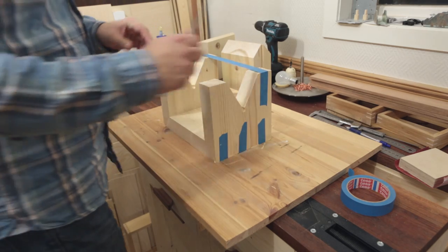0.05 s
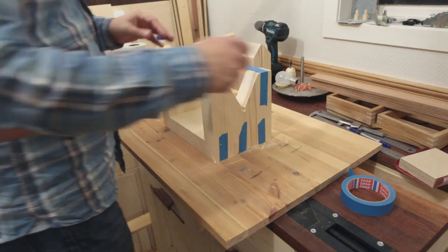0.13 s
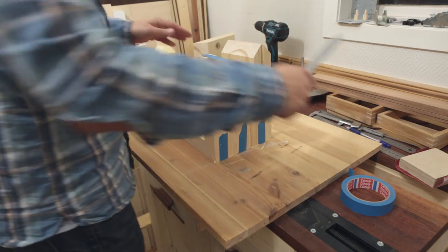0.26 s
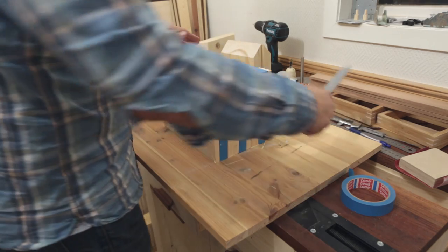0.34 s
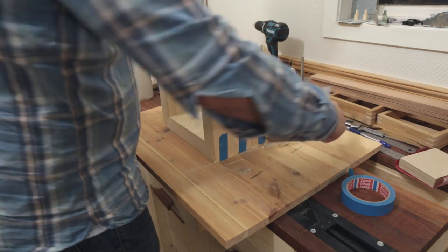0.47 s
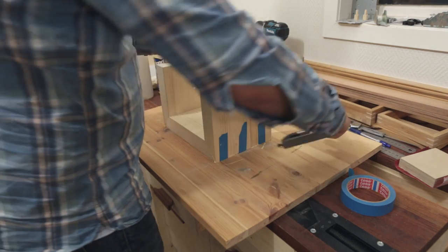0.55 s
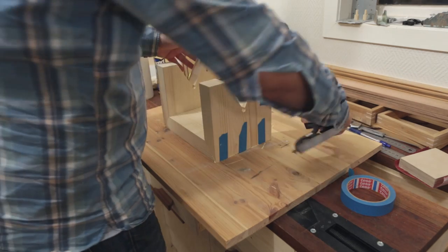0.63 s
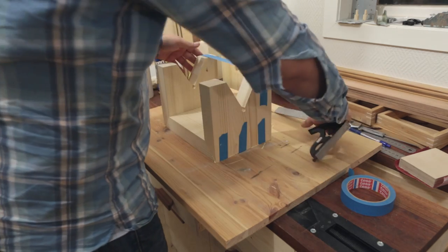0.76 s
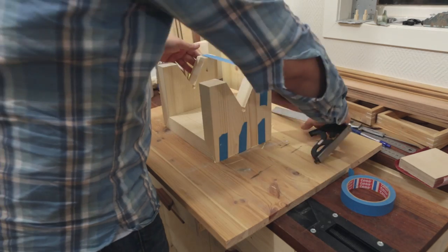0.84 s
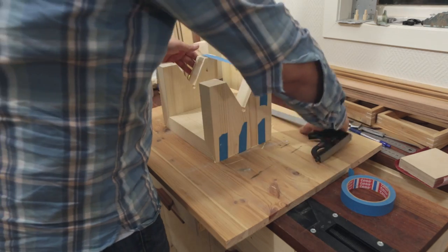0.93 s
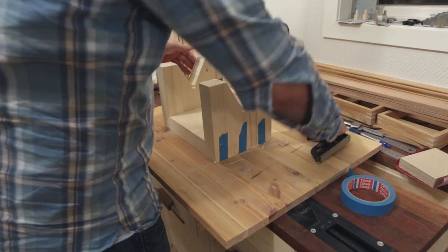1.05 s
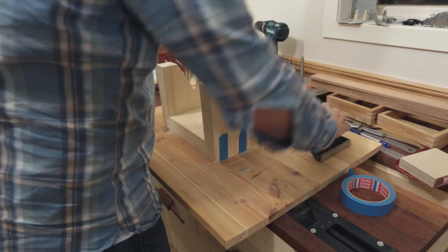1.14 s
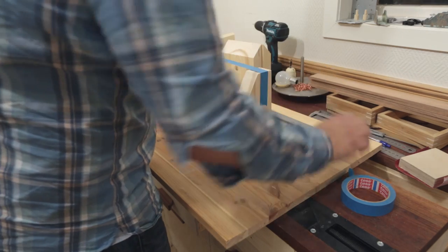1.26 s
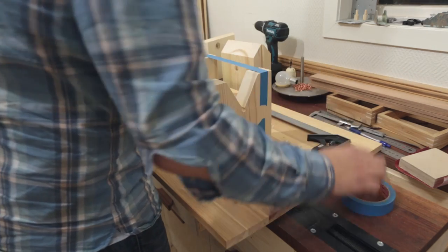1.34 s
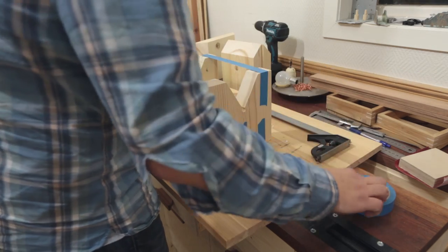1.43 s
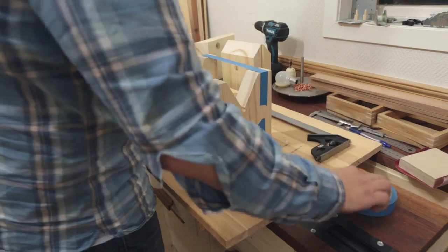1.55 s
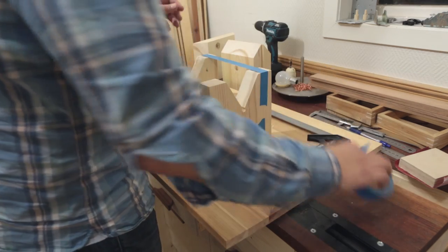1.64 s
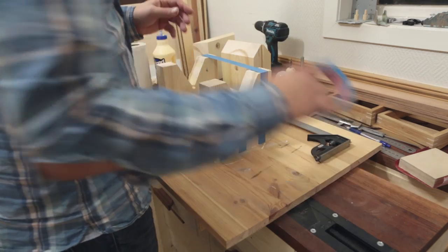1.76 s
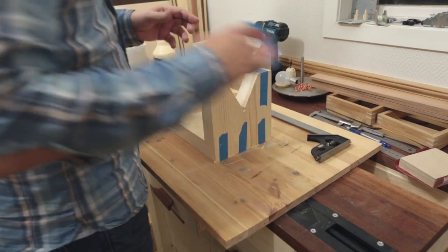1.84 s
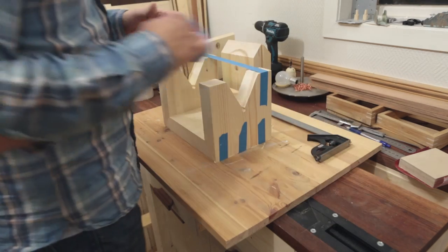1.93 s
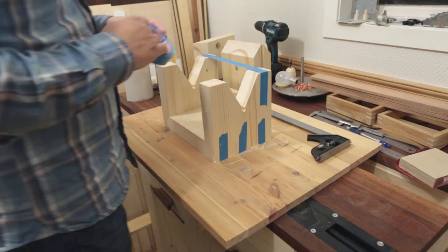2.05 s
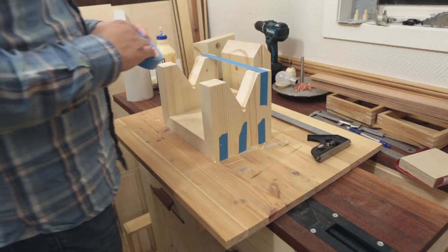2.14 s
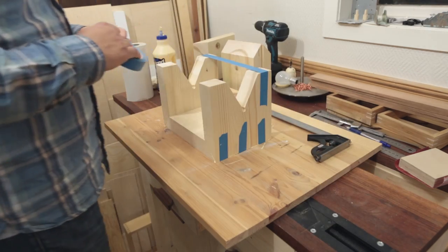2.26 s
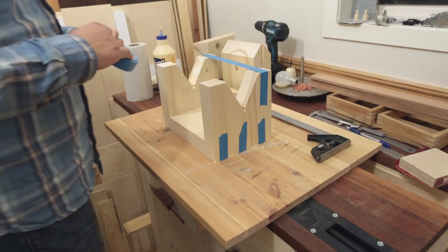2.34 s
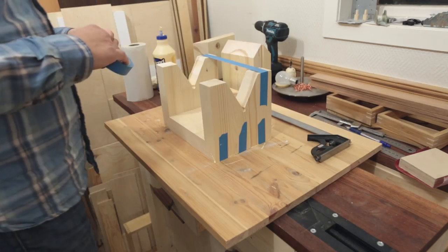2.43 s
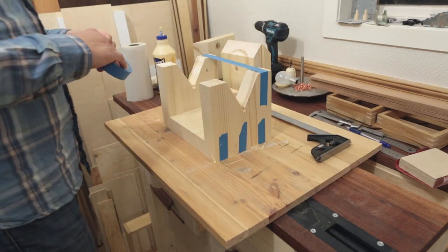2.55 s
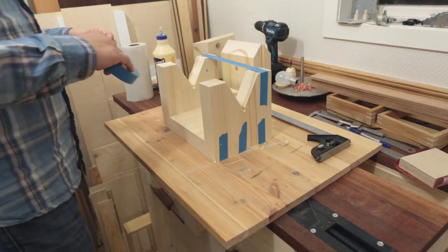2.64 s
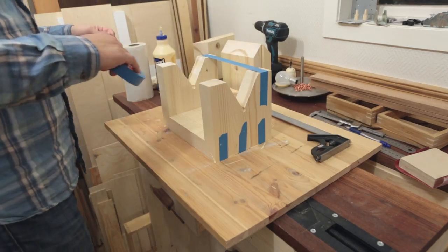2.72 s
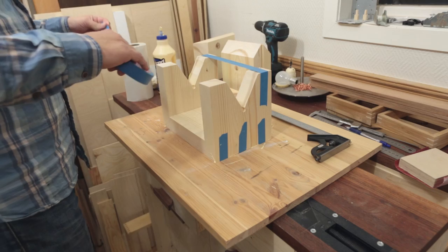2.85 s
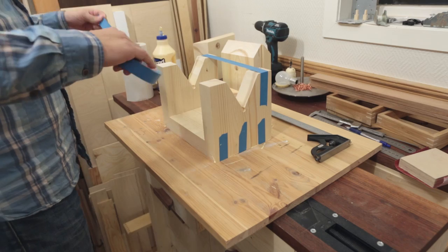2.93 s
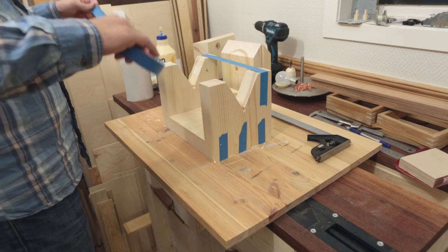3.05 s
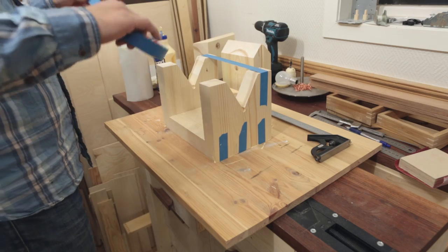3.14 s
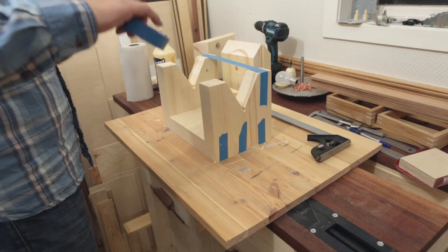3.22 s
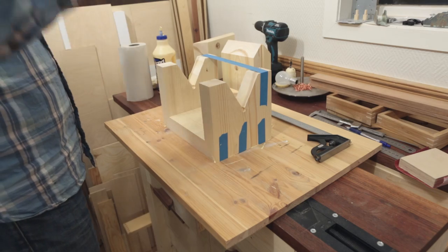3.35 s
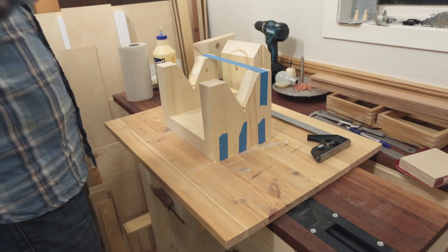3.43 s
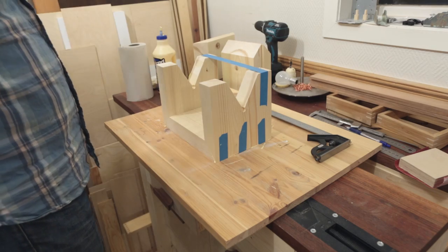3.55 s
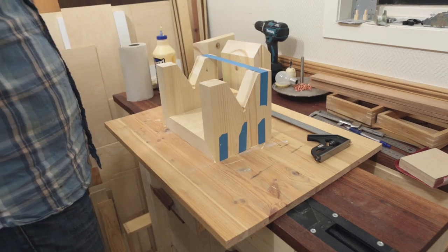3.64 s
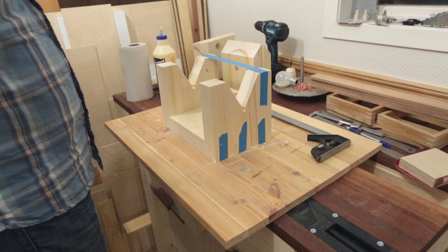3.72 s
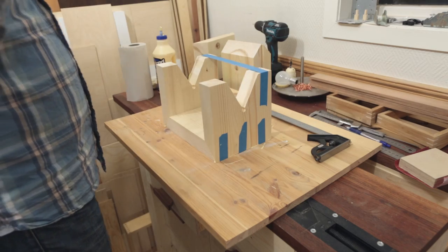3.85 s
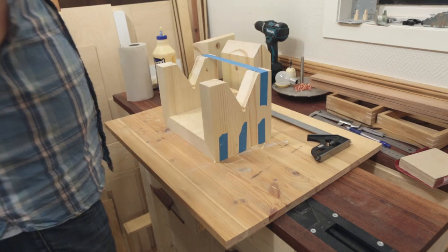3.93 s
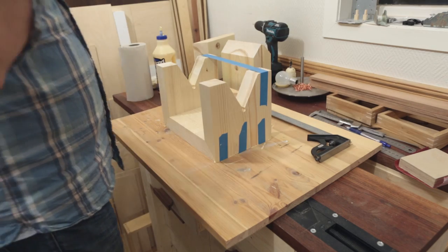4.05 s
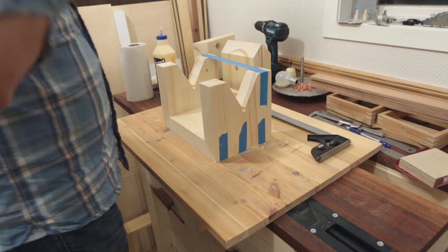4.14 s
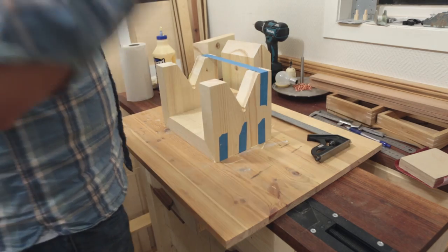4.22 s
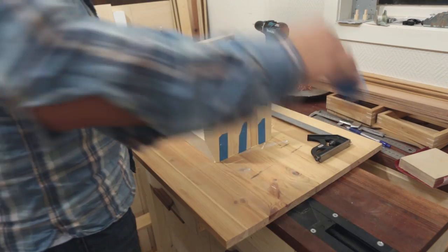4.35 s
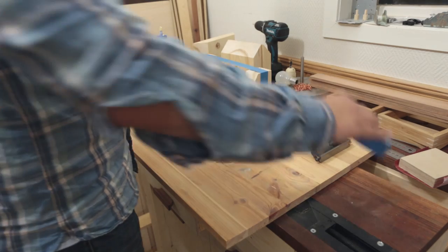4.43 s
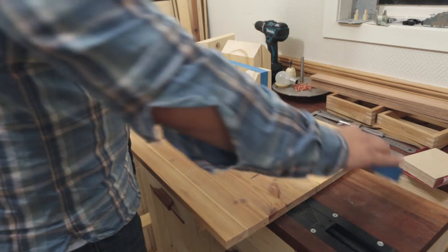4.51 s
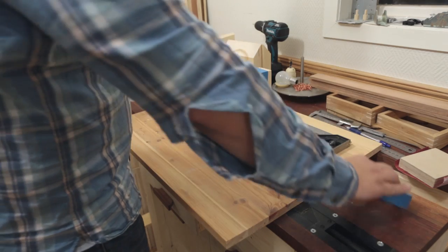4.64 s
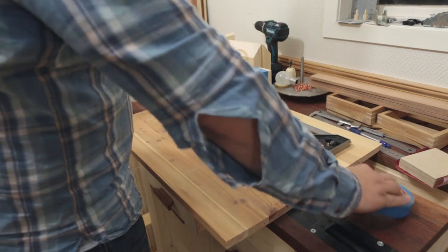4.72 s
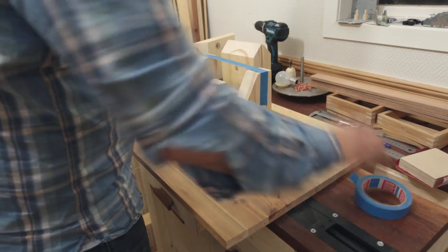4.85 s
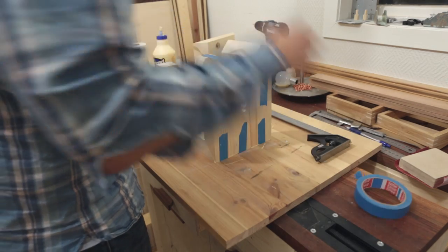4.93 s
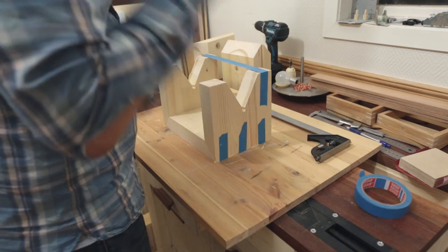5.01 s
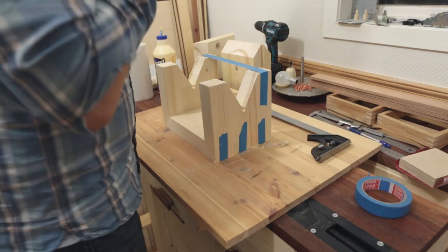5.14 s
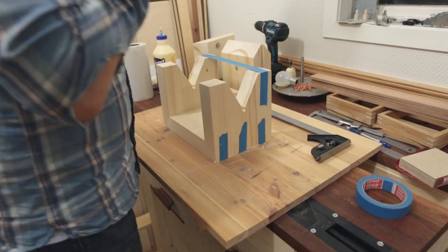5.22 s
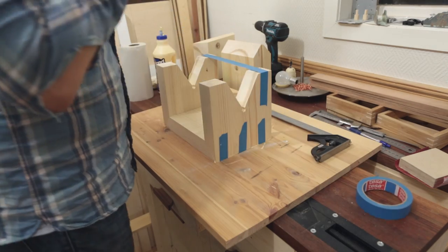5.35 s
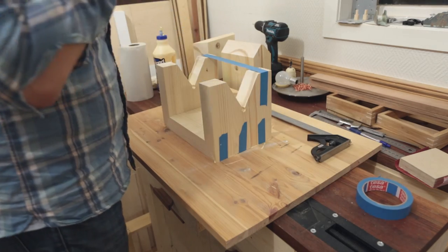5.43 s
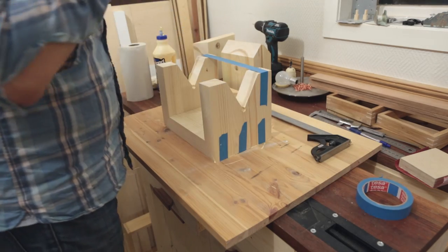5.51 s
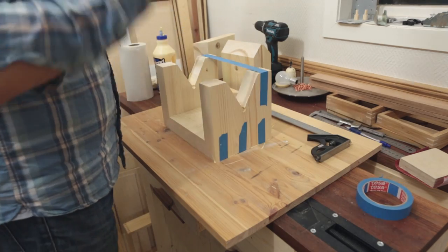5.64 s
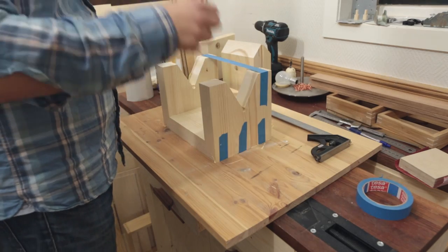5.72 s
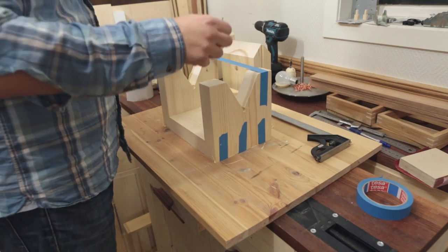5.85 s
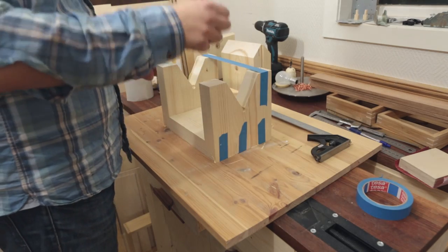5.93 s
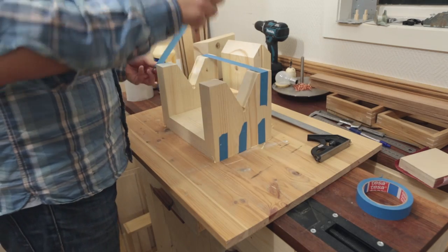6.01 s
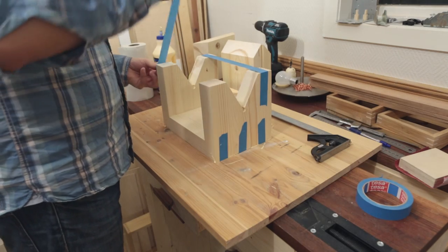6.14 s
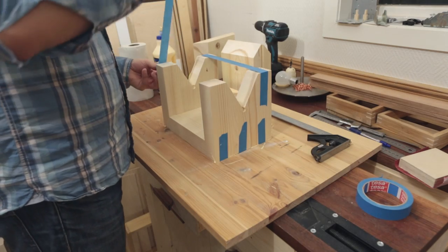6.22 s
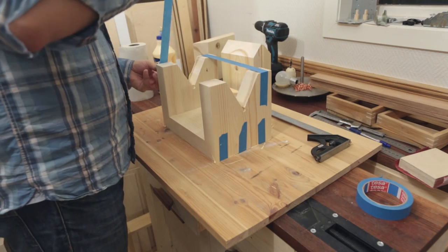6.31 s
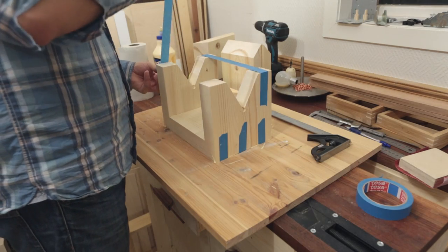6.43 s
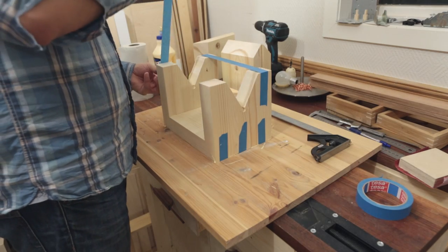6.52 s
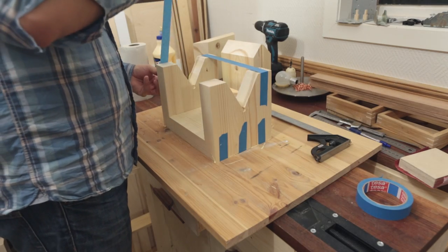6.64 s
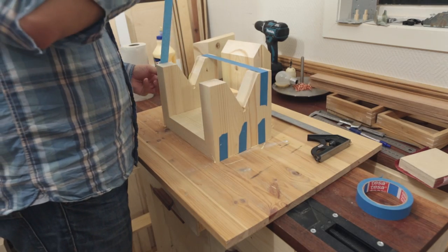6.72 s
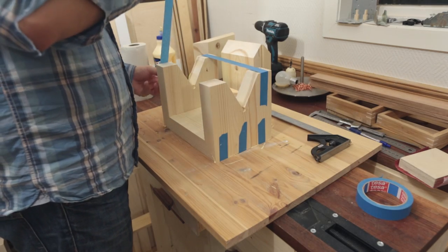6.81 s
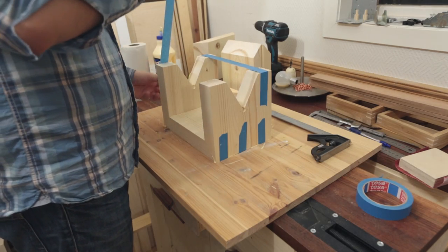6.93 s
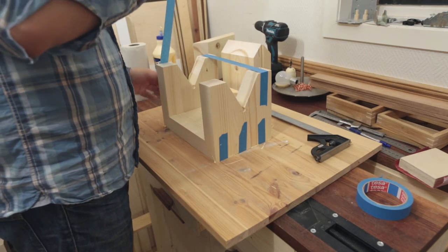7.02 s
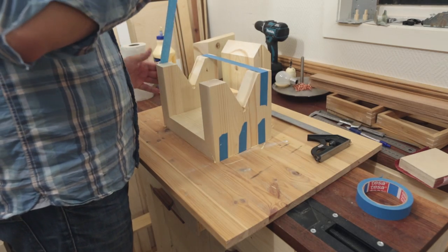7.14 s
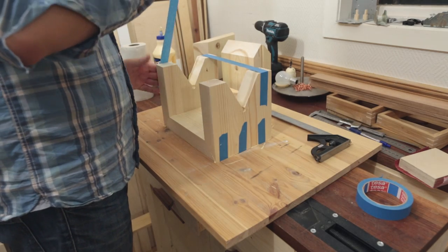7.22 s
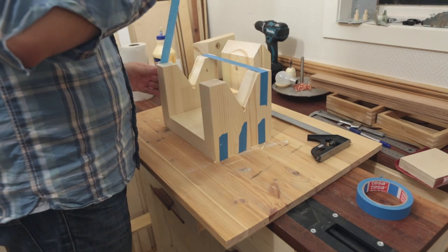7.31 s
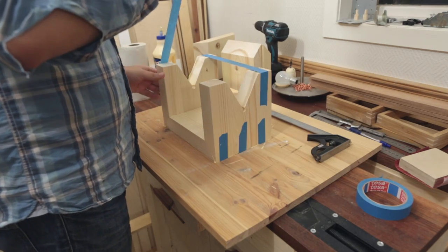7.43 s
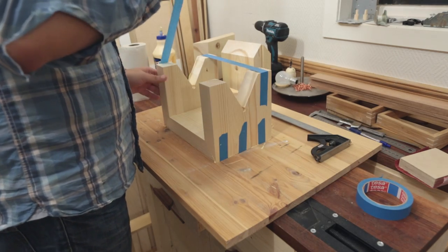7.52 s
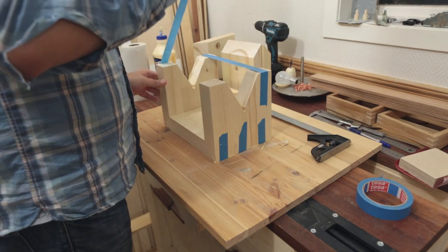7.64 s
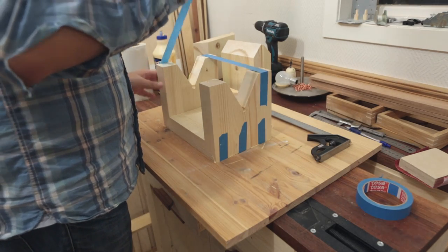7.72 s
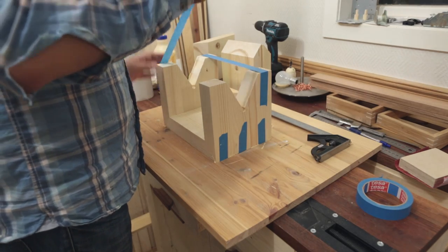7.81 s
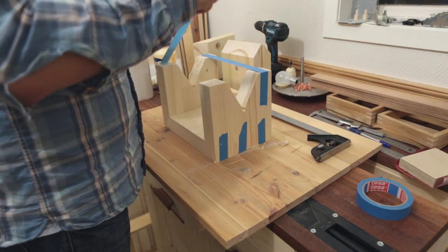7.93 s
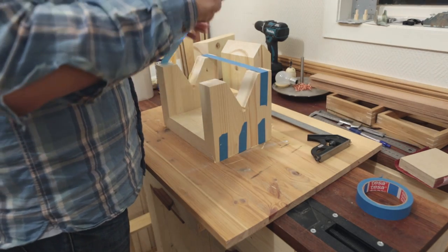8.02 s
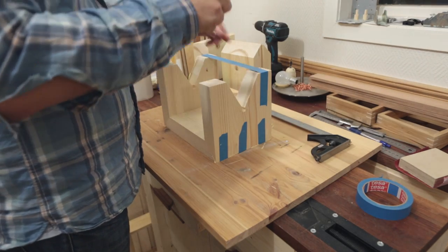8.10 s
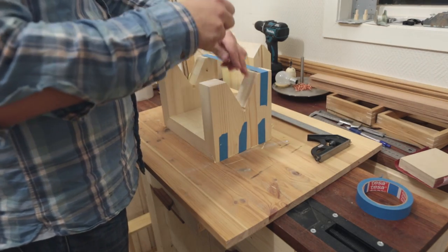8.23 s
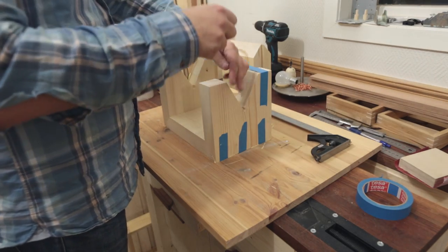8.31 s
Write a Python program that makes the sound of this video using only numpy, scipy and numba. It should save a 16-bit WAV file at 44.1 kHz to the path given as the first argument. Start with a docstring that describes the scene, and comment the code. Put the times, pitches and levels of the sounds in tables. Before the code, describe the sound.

A small, reflective workshop heard from close to the bench, with steady soft hiss and occasional cloth rustle. Dull knocks open at 0-0.1 s. At 0.85-0.93 s a stapler knocks on a pine board, then topples at 1.13-1.27 s with woody boom and a short metallic clatter. Light cardboard taps and soft knocks follow from 1.6 to 2.3 s as the tape roll is lifted. After a tiny start at 2.5 s, a loud, dense, crackling rip runs about 2.6-3.1 s, its pitch sinking as the strip lengthens; short rasping jerks follow at 3.15-3.5 s. Small snaps at 4.04-4.2 s swell into a sharp, very loud tear at 4.21 s. The roll lands at 4.76-4.9 s and wobbles from 5.0 s, quickening, weakening taps over a growing rumble that stops at 5.65 s. A tiny clink at 5.78 s, faint tape squeak near 6, crinkles and snaps around 6.8-7.0, then faint rubs, a squeak and rustle to the end.

```python
"""Soft bench knocks come first, then a stapler is put down on a pine board and topples over: struck modes.
Masking tape is pulled off its roll in one long rip and a few jerks, then torn off: a crackle of
tiny fractures, radiated by a strip that sounds lower as it lengthens. The dropped roll wobbles to
rest in ever quicker taps over a rumble, while the strip crinkles and is smoothed onto the work.
Cloth rustles softly, a small workshop reflects everything, and a steady hiss lies beneath."""
import sys
import numpy as np
from scipy import signal
from scipy.fft import rfft, irfft, next_fast_len
from scipy.io import wavfile
from scipy.ndimage import uniform_filter1d
from numba import njit

SR = 44100
rng = np.random.default_rng(int(sys.argv[2]) if len(sys.argv) > 2 else 0)


def log_audio(samples):
    """Write samples as a 16-bit WAV file to the path given in sys.argv[1]."""
    # one column per channel
    frames = np.atleast_2d(samples).T
    # limit to full scale, then quantise
    limited = np.clip(frames, -1, 1)
    pcm = np.round(limited * 32767).astype(np.int16)
    wavfile.write(sys.argv[1], SR, pcm)


N = 369116
TIME = np.arange(N) / SR

# Glue threads snapping, relative spectrum: pitch_hz [Hz], level_db [dB per Hz]
PEEL_SPECTRUM = [(40, -9), (80, 6), (130, -9), (200, -2), (310, -4), (420, -2), (620, -3.5), (1100, -1.5),
                 (2000, -3.5), (3000, 0.5), (5000, 0.5), (8000, -0.5), (12000, -1), (16000, -5)]
# Resonances of the roll's cardboard core: pitch_hz [Hz], width_hz [Hz], level_db [dB]
CORE_RESONANCES = [(403, 49, 5), (517, 59, 1), (1320, 41, -12), (1550, 68, -0.5)]
# The free strip lengthens with the pull and so sounds lower
STRIP_START_M, STRIP_END_M, SOUND_M_PER_S = 0.028, 0.5, 343
STRIP_SPREAD_SHARE = 0.37   # share of the pull over which the arms do most of their spreading
# Its resonance lies this far above the lowest pitch that it radiates
RING_START_OFFSET_HZ, RING_END_OFFSET_HZ = 1910, 970
GRIP_TIGHT_DB, GRIP_LOOSE_DB = -16, 0.5   # drive of the core in a tight and in a loose hand


def peel():
    """Fracture noise and quarter-wave radiation: glue threads snap, and a longer strip radiates deeper."""
    pull = pull_speed()
    unrolled = np.cumsum(pull) / pull.sum()
    spread = 1 - np.exp(-unrolled / STRIP_SPREAD_SHARE)
    length_m = STRIP_START_M + (STRIP_END_M - STRIP_START_M) * spread
    lowest_hz = SOUND_M_PER_S / (4 * length_m)
    offset_hz = RING_START_OFFSET_HZ + (RING_END_OFFSET_HZ - RING_START_OFFSET_HZ) * unrolled
    lowest_step = np.tan(np.pi * lowest_hz / SR)
    ring_step = np.tan(np.pi * (lowest_hz + offset_hz) / SR)

    # the ridges of the crepe paper let go in clumps
    ridge_noise = low_cut(soften(rng.normal(size=N), 550), 140)
    ridges = unit(amp(3.0 * unit(ridge_noise)))
    snapping = soften(pull, 200, order=1) * ridges * crackle(per_s=4000, spread_db=5.0)
    threads = colour(snapping, PEEL_SPECTRUM)

    # two high-pass stages follow the lowest radiated pitch
    first_stage, _ = sweep(threads, lowest_step, 1.7)
    radiated, _ = sweep(first_stage, lowest_step, .8)
    _, low_ring = sweep(radiated, ring_step, .24)
    _, high_ring = sweep(radiated, 3.1 * ring_step, .18)
    strip_ring = amp(.5) * low_ring + amp(-9) * high_ring

    # the core rings more freely as the arms spread and the grip loosens
    loose = amp(np.interp(unrolled, [.45, .85], [GRIP_TIGHT_DB, GRIP_LOOSE_DB]))
    core_ring = sum(amp(db) * resonate(loose * radiated, hz, width_hz)
                    for hz, width_hz, db in CORE_RESONANCES)
    return radiated + strip_ring + core_ring


# Short jerks on the tape: start_s [s], length_s [s], level_db [dB]
TAPE_JERKS = [(2.514, .03, -49), (2.542, 0.039, -39), (3.155, 0.0073, -30), (3.184, 0.018, -22),
              (3.222, 0.073, -22.5), (3.316, 0.012, -22), (3.442, 0.024, -29), (3.482, 0.036, -47)]
JERK_RELEASE_DB_PER_S = 700
# The long pull speeds up, holds while slowly sagging, and lets go
PULL_FULL_S, PULL_HOLD_S, PULL_DB = 2.6546, .415, -19
PULL_ATTACK_DB_PER_S, PULL_SAG_DB_PER_S, PULL_RELEASE_DB_PER_S = 299, 10.5, 188


def pull_speed():
    """Excitation by speed: one long pull and sudden jerks set how fast the tape leaves the roll, as a gain."""
    speed = stroke(PULL_FULL_S, PULL_DB, PULL_ATTACK_DB_PER_S, PULL_RELEASE_DB_PER_S,
                   PULL_HOLD_S, PULL_SAG_DB_PER_S)
    for s, length, db in TAPE_JERKS:
        jerk = (TIME >= s) * stroke(s, db, 0, JERK_RELEASE_DB_PER_S, length)
        speed = np.maximum(speed, jerk)
    return speed


# Parting paper fibres, relative spectrum: pitch_hz [Hz], level_db [dB per Hz]
FIBRE_SPECTRUM = [(300, -23), (1500, -28), (2800, -10), (4500, -3), (8000, -4.5), (16000, -7.5)]
# Fingers sliding along the tape: middle_s [s], length_s [s], level_db [dB]
FINGER_RUBS = [(5.53, 0.19, -56.5), (6.81, .14, -53), (6.912, 0.017, -36.5), (7.03, 0.055, -52),
               (7.44, 0.097, -54.5), (7.75, 0.091, -63)]
# The tear swells until the strip is off
TEAR_S, TEAR_DB, TEAR_ATTACK_DB_PER_S, TEAR_RELEASE_DB_PER_S = 4.207, -24.5, 340, 1200


def paper():
    """Fibre fracture: crackle bursts as the strip tears across, and again as fingers rub it down."""
    tearing = stroke(TEAR_S, TEAR_DB, TEAR_ATTACK_DB_PER_S, TEAR_RELEASE_DB_PER_S)
    tear = tearing * crackle(per_s=1500, spread_db=6)
    rub = swells(FINGER_RUBS) * crackle(per_s=1000, spread_db=7.0)
    return colour(tear + rub, FIBRE_SPECTRUM)


# Stapler on the board: start_s [s], board_db [dB], ring_db [dB], clatter_db [dB], contact_hz [Hz]
STAPLER_HITS = [(0.8534, -17.5, -30, -23.5, 5060), (0.87, -21.5, -38.5, -37, 1203),
                (0.9096, -24, -35, -10, 3002), (0.928, -16, -41, -16, 699),
                (1.134, -25, -12.5, -16.5, 2580), (1.155, -18, -20.5, -20.5, 1203),
                (1.176, -19, -21, -14, 1985), (1.2279, -39, -12, -18.5, 900),
                (1.242, -19.5, -10.5, -1, 5013), (1.2492, -39, -19, -7, 4982), (1.270, -42, -18, -11, 4962)]
# Modes of the pine board, the steel and the housing: pitch_hz [Hz], level_db [dB], t60_s [s]
BOARD_MODES = [(258, -12, .1), (291.7, 5, 0.21), (344.4, 1, 0.27), (397, 2, .17), (419, -4, 0.17)]
STEEL_MODES = [(787, -15.5, 0.39), (900.6, -12.5, 0.083), (996, -7, 0.14), (1026.6, -3.5, 0.31),
               (1079, -3, 0.071), (1162, -2.5, 0.12), (1366, -21.5, 0.073), (1480, -20.5, 0.14),
               (1780, -16, 0.16), (1845, -21, 0.11), (2266, -17.5, .14), (2694, -23.5, .1),
               (3261, -26, .07), (4000, -29, 0.067), (6640, -22.5, 0.13), (11100, -31.5, .1)]
HOUSING_MODES = [(443, -7, .13), (472.5, -8, .19), (500, -7.5, .1), (538.4, -14, 0.13), (586, -10, .17),
                 (706, -15.5, 0.14)]
# Dense short-lived modes under the separate ones, relative: pitch_hz [Hz], level_db [dB per Hz]
CLATTER_SPECTRUM = [(40, -32.5), (100, -33.5), (200, -15.5), (300, -11), (520, -1), (800, -5.5),
                    (1100, -7.5), (1400, -12.5), (1900, -12.5), (2400, -15.5), (3500, -18.5), (6000, -23.5),
                    (10000, -28.5), (16000, -29.5)]


def stapler():
    """Modal impact: blows boom in the board, ring the steel, rattle the housing; returns (boom, clack)."""
    boom, clack = np.zeros(N), np.zeros(N)
    for s, board_db, ring_db, clatter_db, contact_hz in STAPLER_HITS:
        low_modes = amp(board_db) * ring(BOARD_MODES) + amp(clatter_db) * ring(HOUSING_MODES)
        add(boom, s, low_modes)
        clatter = amp(clatter_db) * burst(CLATTER_SPECTRUM, t60=0.045)
        add(clack, s, soften(amp(ring_db) * ring(STEEL_MODES) + clatter, contact_hz, order=1))
    return low_cut(boom, 120), low_cut(clack, 40)


# Fingers and the roll tapping: start_s [s], level_db [dB], contact_hz [Hz]
CORE_TAPS = [(1.627, -28.5, 8150), (2.048, -27, 5950), (2.3275, -22.5, 3046), (4.900, -16.5, 6040),
             (4.9115, -11.5, 11020), (5.568, -24, 9000), (5.7815, -23, 3500), (6.905, -21, 4000)]
# Tap on cardboard, relative spectrum: pitch_hz [Hz], level_db [dB per Hz]
TAP_SPECTRUM = [(150, -28), (700, -12.5), (1400, -1), (2500, 0), (4000, -4), (7000, -3.5), (16000, -11)]
# Snaps of the taut strip: start_s [s], level_db [dB], lowest_hz [Hz]
STRIP_SNAPS = [(4.0395, -16, 2470), (4.148, -15, 3000), (4.1572, -12, 3000), (4.1756, -6, 2360),
               (4.1962, -3, 2300), (4.2087, 13.5, 1420), (4.211, 4.5, 250), (4.2154, -4, 200),
               (6.8272, -12.5, 1200), (6.910, -22, 300), (6.9124, -8.5, 300)]
# Snap of the strip, relative spectrum: pitch_hz [Hz], level_db [dB per Hz]
SNAP_SPECTRUM = [(40, -33), (150, -24), (400, -9.5), (1200, -5.5), (2300, -3.5), (3300, -2.5), (4400, 1),
                 (6500, -3), (10000, -7.5), (16000, -12)]
# Modes of a light clink: pitch_hz [Hz], level_db [dB], t60_s [s]
CLINK_MODES = [(1276, 8, 0.036), (1298, -26, 0.28), (1390, 4, 0.066), (1520, -10, 0.061), (3340, -3, 0.035),
               (3750, -12, 0.052), (4620, -6, 0.04)]
CLINK_S, CLINK_DB = 5.7814, -40.5
RIM_DB, RIM_LOSS_DB, RIM_CONTACT_HZ = -16, 2.5, 4900   # first touch; loss per touch


def small_clicks():
    """Impulse response: taps on the cardboard core, snaps of the strip and a clink are brief pulses."""
    out = np.zeros(N)
    rim = [(s, RIM_DB - RIM_LOSS_DB * k, RIM_CONTACT_HZ) for k, s in enumerate(rim_touches())]
    for s, db, contact_hz in list(CORE_TAPS) + rim:
        tap = amp(db) * click(TAP_SPECTRUM, rattle_db=-17, t60=0.026)
        add(out, s, soften(tap, contact_hz))
    for s, db, lowest_hz in STRIP_SNAPS:
        snap = amp(db) * click(SNAP_SPECTRUM, rattle_db=-30.5, t60=0.025)
        add(out, s, low_cut(snap, lowest_hz))
    add(out, CLINK_S, amp(CLINK_DB) * ring(CLINK_MODES))
    return low_cut(out, 70)


# The dropped roll wobbles: its rim touches down ever sooner
WOBBLE_START_S, WOBBLE_GAP_S, WOBBLE_GAP_RATIO = 4.997, .088, .935


def rim_touches(count=9):
    """Geometric series of contacts: each gap between touches of the rim is a fixed share of the last."""
    elapsed_gaps = (1 - WOBBLE_GAP_RATIO ** np.arange(count)) / (1 - WOBBLE_GAP_RATIO)
    return WOBBLE_START_S + WOBBLE_GAP_S * elapsed_gaps


# The rumble grows as the roll flattens, surges after each touch and stops when it lies still
REST_S, RUMBLE_DB, RUMBLE_GROWTH_DB_PER_S, RUMBLE_STOP_DB_PER_S = 5.645, -49, 15.5, 800
SURGE_DB, SURGE_S = 3, 0.036
SETTLE_LENGTH_S, SETTLE_DB = 0.094, -41.5


def wobble():
    """Rolling contact force: it grows, surges after each touch and ends in a shudder."""
    surges = sum(swell(s + SURGE_S / 2, SURGE_S, 0) for s in rim_touches())
    growth = stroke(REST_S, RUMBLE_DB, RUMBLE_GROWTH_DB_PER_S, RUMBLE_STOP_DB_PER_S)
    turning = growth * amp(SURGE_DB * surges)
    shudder = swell(REST_S, SETTLE_LENGTH_S, SETTLE_DB) * stroke(REST_S, 0, 0, RUMBLE_STOP_DB_PER_S)
    return (TIME > WOBBLE_START_S - WOBBLE_GAP_S) * turning + shudder


# Rumble of rolling, relative spectrum: pitch_hz [Hz], level_db [dB per Hz]
ROLLING_SPECTRUM = [(60, -21), (130, -5.5), (220, -1.5), (300, 8), (450, -3), (630, 5.5), (780, -4),
                    (950, -17), (1500, -14.5), (2500, -26.5), (5000, -46)]
# The work shifting under the fingers: middle_s [s], length_s [s], level_db [dB]
WORK_NUDGES = [(6.912, 0.013, -49.5), (6.99, 0.062, -60), (7.68, 0.12, -69)]
# Modes of the bench top, also used by bench_knocks: pitch_hz [Hz], level_db [dB], t60_s [s]
BENCH_MODES = [(310, -12, 0.19), (336.8, 3, 0.36), (480, -1, 0.098), (585, -2, 0.12), (616, -31, 0.081),
               (757, -17, .07)]
BENCH_HUM_DB = 2   # gain of the bench's hum


def rolling():
    """Forced vibration: the roll and later the shifting work rumble and drive the bench; (rumble, hum)."""
    bumps = (wobble() + swells(WORK_NUDGES)) * crackle(per_s=450, spread_db=3)
    bench = ring(BENCH_MODES)
    hum = signal.fftconvolve(bumps, bench / np.linalg.norm(bench))[:N]
    return colour(bumps, ROLLING_SPECTRUM), amp(BENCH_HUM_DB) * low_cut(hum, 230)


# Things set down on the bench or lifted off it:
# start_s [s], level_db [dB], ring_db [dB], lowest_hz [Hz], contact_hz [Hz]
BENCH_CONTACTS = [(.045, -36, -56, 174, 485), (0.066, -29, -47, 250, 480), (0.1028, -17.5, -62, 50, 2800),
                  (1.7338, -25, -52, 360, 499), (1.756, -27, -68, 376, 466),
                  (1.9108, -34, -49.5, 375.6, 480), (4.760, -22, -34.5, 289, 1020),
                  (4.776, -25.5, -40, 250, 760), (5.541, -29, -43, 402, 1100)]
# Dull knock, relative spectrum: pitch_hz [Hz], level_db [dB per Hz]
THUD_SPECTRUM = [(40, -13), (90, -16), (140, -5), (220, -2), (350, -3.5), (600, -2), (1000, -3.5),
                 (1400, -10.5), (2200, -17), (3500, -27.5), (8000, -42)]
# Each touch of the rim also knocks dully on the bench and sets it ringing
RIM_KNOCK_DB, RIM_RING_DB, RIM_LOWEST_HZ, RIM_SOFT_HZ = -38, -45.5, 260, 860


def bench_knocks():
    """Soft-contact impact: a low-passed blow gives a dull knock on the heavy bench top."""
    out = np.zeros(N)
    rim = [(s, RIM_KNOCK_DB, RIM_RING_DB, RIM_LOWEST_HZ, RIM_SOFT_HZ) for s in rim_touches()]
    for s, db, ring_db, lowest_hz, contact_hz in list(BENCH_CONTACTS) + rim:
        knock = amp(db) * burst(THUD_SPECTRUM, t60=0.041) + amp(ring_db) * ring(BENCH_MODES)
        add(out, s, low_cut(soften(knock, contact_hz, order=4), lowest_hz))
    return out


# Faint squeaks as the tape is drawn tight: middle_s [s], length_s [s], level_db [dB]
TAPE_SQUEAKS = [(6.0, 0.2, -63), (7.72, 0.22, -64)]
SQUEAK_HZ = 1247


def squeak(width_hz):
    """Friction-excited resonance: noise passes twice through one narrow peak."""
    once = resonate(rng.normal(size=N), SQUEAK_HZ, width_hz)
    return swells(TAPE_SQUEAKS) * unit(resonate(once, SQUEAK_HZ, width_hz))


# Sleeves and hands moving: middle_s [s], length_s [s], level_db [dB]
CLOTH_MOVES = [(.05, 0.26, -52.5), (.62, 0.64, -61.5), (1.85, 0.31, -57.5), (2.25, .35, -62.5),
               (4.04, .24, -60.5), (5.05, 0.52, -57), (5.8, 0.36, -67.5), (6.9, .12, -56),
               (7.6, 0.4, -61.5), (8.25, .3, -68)]
# Rustling cloth, relative spectrum: pitch_hz [Hz], level_db [dB per Hz]
CLOTH_SPECTRUM = [(100, -5), (300, -1.5), (1000, -5.5), (3000, -6), (7000, -11.5), (16000, -16)]


def sleeves():
    """Friction noise: dense crackle, coloured as cloth, swells with each movement."""
    return swells(CLOTH_MOVES) * colour(crackle(per_s=3000, spread_db=1.5), CLOTH_SPECTRUM)


# Steady hiss, relative spectrum: pitch_hz [Hz], level_db [dB per Hz]
AIR_SPECTRUM = [(15, -58.5), (25, -21), (140, -10), (253, -8.5), (322, -10.5), (359, -9), (666, -12),
                (722, -11), (1080, -12.5), (1660, -14.5), (2120, -14), (2560, -16.5), (3440, -16.5),
                (9810, -21), (15500, -26)]
AIR_DB = -57


def hiss():
    """Stationary noise: white noise shaped by a fixed spectrum."""
    return amp(AIR_DB) * colour(rng.normal(size=N), AIR_SPECTRUM)


# Decay of the room: pitch_hz [Hz], t60_s [s]
ROOM_DECAY = [(100, 0.52), (300, 0.42), (1000, 0.38), (3000, 0.39), (7000, 0.32), (15000, 0.32)]


def workshop(early_db, early_t60, late_db, wall_hz):
    """Reverberation: a quick cluster from bench and wall, then a tail that dies sooner in the treble."""
    edges, tail = np.geomspace(70, 18000, num=13), 0
    for low, high in zip(edges, edges[1:]):
        band_pass = signal.butter(2, [low, high], "band", fs=SR, output="sos")
        band = signal.sosfilt(band_pass, rng.normal(size=SR // 2))
        tail = tail + band * fade(at_hz(ROOM_DECAY, np.sqrt(low * high)))
    age = TIME[:SR // 2]
    early = rng.normal(size=len(age)) * fade(early_t60) * (age > .002)
    tail = tail * np.clip(age / .012, 0, 1)
    response = amp(early_db) * unit(early) + amp(late_db) * unit(tail)
    return soften(response, wall_hz, order=1) / np.sqrt(len(age))


def reflections(x, turns_per_s):
    """Time-varying reflection: hands and body keep moving, so one pattern gives way to another."""
    angle = 2 * np.pi * turns_per_s * TIME
    out = 0
    for share in (np.cos(angle), np.sin(angle)):
        room = workshop(early_db=-3.0, early_t60=.05, late_db=-4.0, wall_hz=11400)
        out = out + signal.fftconvolve(x * share, room)[:N]
    return out


def amp(db):
    """Logarithmic level: decibels to gain."""
    return 10 ** (np.asarray(db) / 20)


def unit(x):
    """Power normalisation: scale to rms 1."""
    return x / np.sqrt(np.mean(x ** 2) + 1e-20)


def at_hz(points, hz):
    """Logarithmic pitch: read a table on a log-frequency axis."""
    known_hz, values = np.transpose(points)
    return np.interp(np.log(np.maximum(hz, 1)), np.log(known_hz), values)


def colour(x, spectrum):
    """Minimum-phase (causal) filtering with this spectrum; white noise keeps its power."""
    size = 2 * next_fast_len(len(x))
    gains = unit(amp(at_hz(spectrum, np.linspace(0, SR / 2, size // 2 + 1))))
    cepstrum = irfft(np.log(gains))
    # folding the cepstrum forward makes the filter causal
    cepstrum[1:size // 2] *= 2
    cepstrum[size // 2 + 1:] = 0
    return irfft(rfft(x, size) * np.exp(rfft(cepstrum)))[:len(x)]


def soften(x, hz, order=2):
    """Contact stiffness as a low-pass: a softer contact passes less treble."""
    return signal.sosfilt(signal.butter(order, min(hz, .45 * SR), fs=SR, output="sos"), x)


def low_cut(x, hz):
    """Radiation as a high-pass: small things radiate little bass."""
    return signal.sosfilt(signal.butter(2, hz, "high", fs=SR, output="sos"), x)


def resonate(x, hz, width_hz):
    """Single resonance, gain 1 at its peak."""
    return signal.lfilter(*signal.iirpeak(hz, hz / width_hz, fs=SR), x)


@njit
def sweep(x, step, damping):
    """State-variable filter with a moving centre: high-pass and band-pass outputs."""
    high, band = np.zeros(len(x)), np.zeros(len(x))
    first = second = 0.0
    for i in range(len(x)):
        g = step[i]
        high[i] = (x[i] - (damping + g) * first - second) / (1 + g * (damping + g))
        band[i] = g * high[i] + first
        first = band[i] + g * high[i]
        second += 2 * g * band[i]
    return high, band * damping


def fade(t60):
    """Exponential damping: half a second of decay, 60 dB per t60."""
    return 1000.0 ** (-TIME[:SR // 2] / t60)


def add(out, s, sound):
    """Superposition: mix a sound in at time s."""
    start = round(s * SR)
    out[start:start + len(sound)] += sound[:N - start]


def ring(modes):
    """Modal synthesis: damped sines, each with a slightly different strength on every blow."""
    age, out = TIME[:SR // 2], 0
    for k, (hz, db, t60) in enumerate(modes):
        strength = (-1) ** k * amp(db + rng.normal())   # neighbours in opposite phase
        out = out + strength * fade(t60) * np.sin(2 * np.pi * hz * age)
    return out


def burst(spectrum, t60):
    """High modal density: many overlapping modes die together, as decaying noise."""
    return colour(rng.choice([-1, 1], SR // 2) * fade(t60), spectrum)


def click(spectrum, rattle_db, t60):
    """Impulse excitation: one sharp pulse with a brief rattle behind it."""
    pulse = amp(rattle_db) * rng.normal(size=SR // 2) * fade(t60)
    pulse[0] = 1
    return colour(pulse, spectrum)


def crackle(per_s, spread_db):
    """Random point process: tiny fractures of uneven size, at an even mean level."""
    sizes = amp(spread_db * np.clip(rng.normal(size=N), -2, 2)) * rng.choice([-1, 1], N)
    clicks = sizes * (rng.random(N) < per_s / SR)
    return clicks / np.sqrt(np.abs(uniform_filter1d(clicks ** 2, size=900)) + 1e-6)


def swell(s, length, db):
    """Gaussian envelope: a smooth rise and fall around time s."""
    return amp(db) * np.exp(-np.minimum(2 * ((TIME - s) / length) ** 2, 30))


def swells(rows):
    """Summed envelopes: one swell for each (middle_s, length_s, level_db) row."""
    return sum(swell(*row) for row in rows)


def stroke(s, db, attack_db_per_s, release_db_per_s, hold_s=0, sag_db_per_s=0):
    """Exponential envelope: a gain that climbs to db at time s, sags while held, then is released."""
    age = TIME - s
    rise = attack_db_per_s * np.maximum(-age, 0)
    sag = sag_db_per_s * np.clip(age, 0, hold_s)
    release = release_db_per_s * np.maximum(age - hold_s, 0)
    return amp(db - np.minimum(rise + sag + release, 150))


def scene():
    """Superposition of direct and reflected sound: all sources in the room, over a steady hiss."""
    boom, clack = stapler()
    rumble, hum = rolling()
    small = clack + bench_knocks() + small_clicks() + peel() + paper()
    small = small + rumble + squeak(width_hz=150) + sleeves()
    wood = boom + hum   # the broad bench top is close to the microphone, so it is heard drier
    reflected = reflections(small + amp(-9) * wood, turns_per_s=1.6)
    return (small + wood + reflected + hiss())[None]


def gain_control(x, threshold_db, share, release_db_per_s, attack_hz):
    """Dynamic compression: loud sounds pull the gain down; it creeps back afterwards."""
    loudness = 10 * np.log10(np.abs(soften(x[0] ** 2, 27, order=1)) + 1e-12)
    cut = share * np.maximum(loudness - threshold_db, 0)
    held = np.maximum.accumulate(cut + release_db_per_s * TIME) - release_db_per_s * TIME
    return x * amp(-soften(held, attack_hz, order=1))


CUTOFF_HZ = 15920


def record(dry):
    """Compression, clipping and band-limiting: gain control, a brittle overload, a steep top cut."""
    levelled = gain_control(dry, threshold_db=-17.0, share=0.22, release_db_per_s=17.0, attack_hz=11)
    distortion = low_cut(np.clip(levelled, -1, 1) - levelled, 400)   # only beyond full scale
    top_cut = signal.ellip(12, .1, 70, CUTOFF_HZ, fs=SR, output="sos")
    return signal.sosfilt(top_cut, levelled + distortion)


dry = scene()
out = record(dry)
log_audio(out)
```